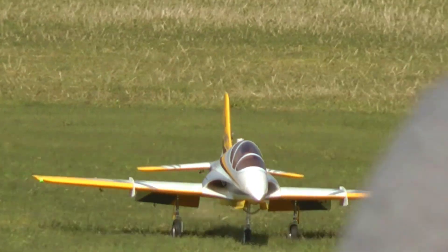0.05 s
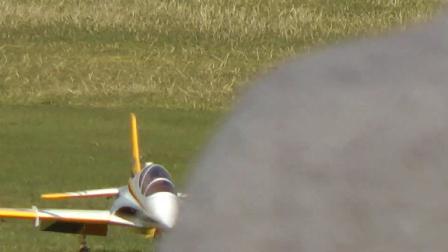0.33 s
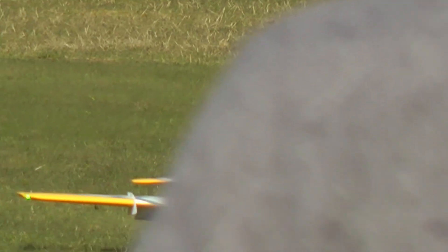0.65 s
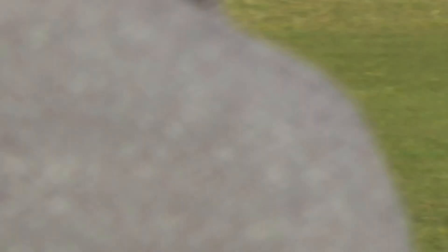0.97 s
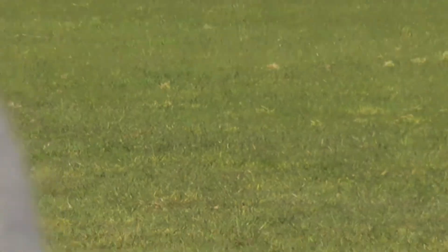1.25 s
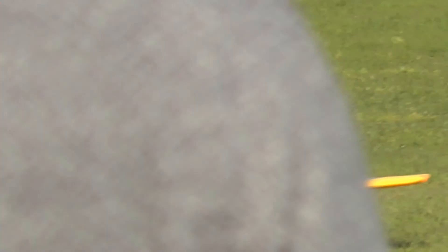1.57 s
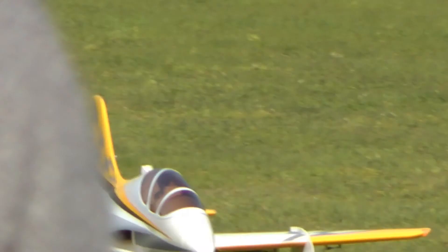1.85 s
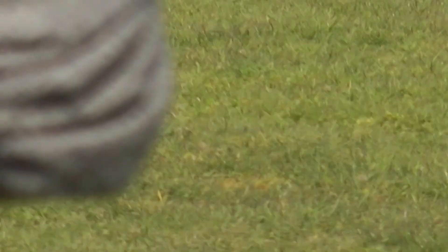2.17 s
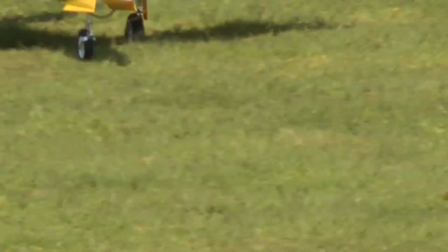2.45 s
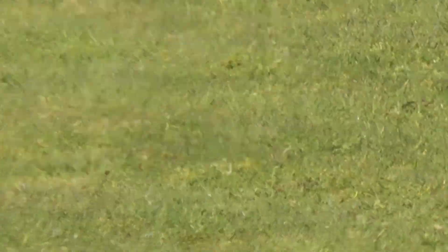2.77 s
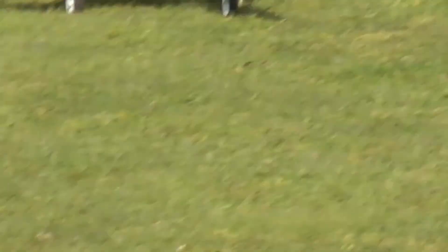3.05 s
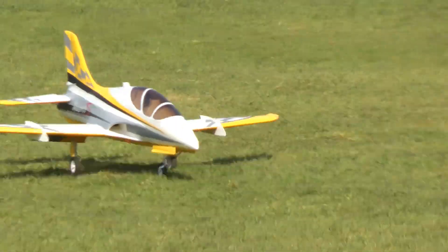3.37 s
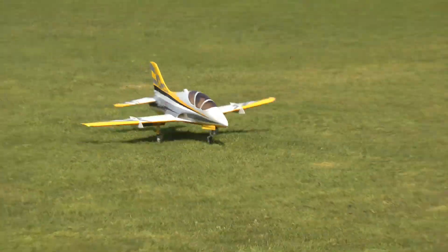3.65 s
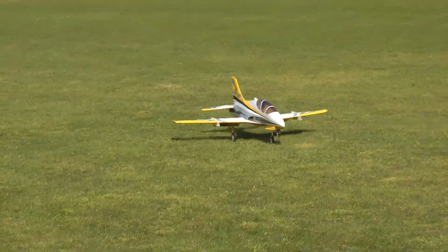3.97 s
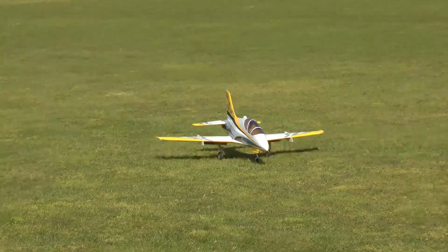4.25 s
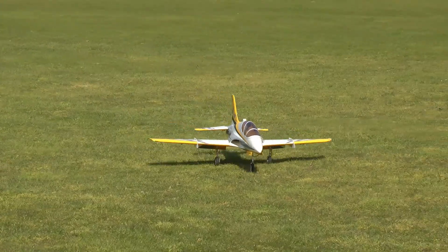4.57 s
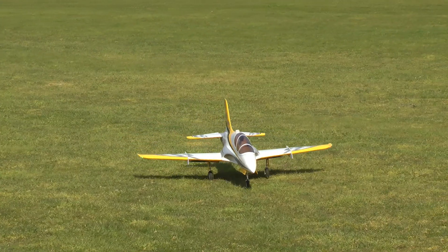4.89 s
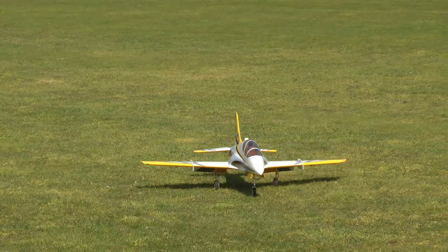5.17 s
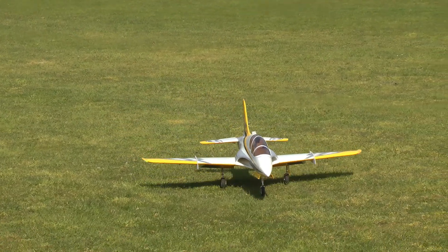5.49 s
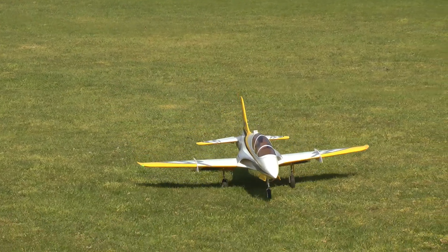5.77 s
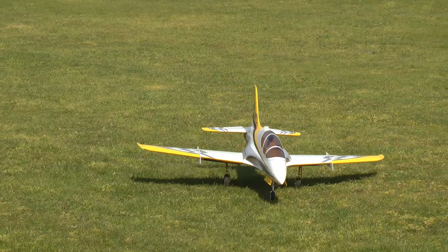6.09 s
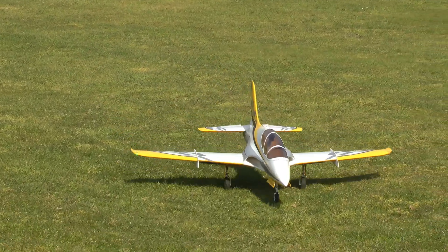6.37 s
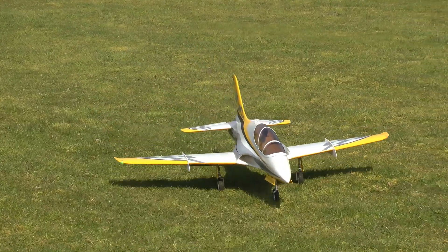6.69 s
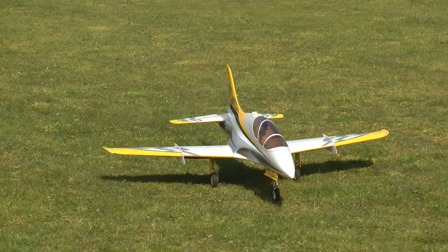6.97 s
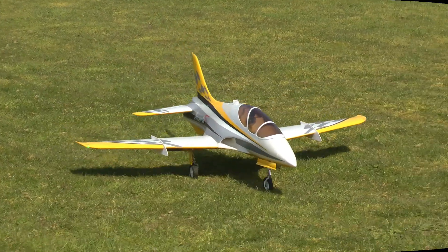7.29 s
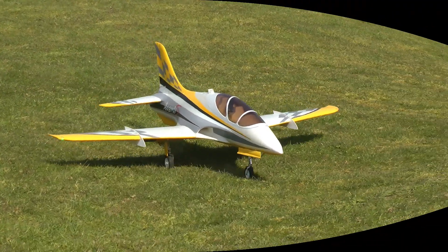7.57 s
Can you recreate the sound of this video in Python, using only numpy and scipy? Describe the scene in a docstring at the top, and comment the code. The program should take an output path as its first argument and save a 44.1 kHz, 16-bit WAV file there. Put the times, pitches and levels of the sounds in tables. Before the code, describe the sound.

Wind rumbles and buffets the microphone on an open grass field. A model jet's electric fan, faint at first, whines and rushes in short bursts of throttle, each rising in pitch with a thin high whistle and then sinking. It grows steadily louder as it taxis closer from straight ahead. At the end, close by, the tyres swish through the grass, the wheels rattle briefly and the fan runs down.

```python
"""An open grass field in the wind; a stereo microphone, and a model jet nearly straight ahead.
Gusts buffet the microphone from the start, while the electric ducted fan whines and rushes some way off.
The jet taxis closer on bursts of throttle, its speed controller whistling as it drives the motor.
In the longer coasts the motor sings a falling note. At the end, close by, the tyres swish through
the grass, the wheels jolt and the fan runs down."""
import sys
import numpy as np
from scipy import signal
from scipy.fft import rfft, irfft
from scipy.io import wavfile
from scipy.ndimage import uniform_filter1d

SR = 44100
rng = np.random.default_rng(int(sys.argv[2]) if len(sys.argv) > 2 else 0)


def generate_wav(sig):
    """Save sig (samples, or channels by samples) to the path in sys.argv[1] as 16-bit PCM at SR."""
    pcm = np.round(np.clip(np.atleast_2d(sig).T, -1, 1) * 32767).astype(np.int16)
    wavfile.write(sys.argv[1], SR, pcm)


N = 345744
T = np.arange(N) / SR
CRUISE_SPEED, IDLE_SPEED = 200, 125  # shaft turns a second (rps)

# pushes of the stick: opens t/s, rise/s, held no-load speed/rps, eases off t/s, fall/s,
# left at no-load speed/rps, then relative level/dB of switching whistle, blade tone and upper whine
THROTTLE = [(0.0, 0.0, 351, 0.087, 0.034, 297, -73, 8, 7),
            (0.299, 0.099, 305, 0.703, 0.134, 230, -66, -2, 0),
            (0.955, 0.065, 212, 1.225, 0.079, 164, -57, -4, 0),
            (1.333, 0.376, 303, 1.731, 0.238, 166, -46, -7, 0),
            (2.462, 0.219, 268, 2.787, 0.241, 139, -45, -6, 0),
            (3.06, 0.206, 348, 3.542, 0.206, 72, -40.5, -14, 3),
            (4.033, 0.175, 293, 4.49, 0.18, 112, -41, -8, -7),
            (4.905, 0.175, 297, 5.344, 0.257, 141, -49, -6, -7),
            (5.607, 0.132, 300, 5.886, 0.152, 168, -52, -2, -8),
            (6.138, 0.078, 298, 6.384, 0.186, 143, -41, -2, -8),
            (6.722, 0.1, 253, 6.949, 0.421, 0, -34, -3, -7)]
# the rush at cruising speed as the jet nears and turns: t/s, relative level/dB, intake honk/dB, treble/dB
BEARING = [(0, -58, 10, -4.5), (.28, -56, 0.5, -5.5), (.7, -45.5, -6, -13), (1.0, -44.5, -4, -15),
           (1.4, -41, -5.5, -14), (1.75, -39.5, -3.5, -11.5), (2.12, -38.5, -6.5, -6.5),
           (2.35, -34, -10.5, -16.5), (2.95, -36.5, 3.5, -17.5), (3.3, -34, -2, -18.5),
           (3.62, -31, -5, -16), (4.0, -29, -9.5, -24), (4.3, -27, -5, -21.5), (4.65, -32.5, -6, -18),
           (5.35, -32, -2, -14), (5.8, -28.5, 1, -13), (6.4, -27.5, 2.5, -10.5), (6.95, -26, 0.5, -14),
           (7.4, -28.5, 4, -11.5), (7.84, -22.5, 10, -11)]
# motor hum and tyres grow as the jet rolls up to the microphone: t/s, gain/dB
NEARNESS = [(4, -12), (4.9, -12), (7.3, 0), (7.84, 0)]


def gain_of(db):
    """Decibels to amplitude."""
    return 10 ** (np.asarray(db) / 20)


def unit_rms(x):
    """Scales to unit rms."""
    return x / np.sqrt(np.mean(x ** 2) + 1e-20)


def curve(rows, t, column=1):
    """One column of a table at the times t."""
    rows = np.asarray(rows, float)
    return np.interp(t, rows[:, 0], rows[:, column])


def spectrum(points, hz):
    """Joins (f/Hz, value) points on a log-frequency axis."""
    f, value = np.transpose(points)
    return np.interp(np.log(hz + 1), np.log(f + 1), value)


def wander(rate_hz):
    """Smooth random drift of unit rms, up to about the given rate."""
    f = np.fft.rfftfreq(N, 1 / SR)
    return unit_rms(irfft(rfft(rng.standard_normal(N)) / (1 + (f / rate_hz) ** 4), N))


def grid(size):
    """Frame times (a row) and bin frequencies (a column) of short-time spectra."""
    hop = size // 4
    return np.arange(N // hop + 5) * hop / SR, np.fft.rfftfreq(size, 1 / SR)[:, None]


def noise(shape_db, patchy_db, size):
    """Noise shaped in frequency and time, with drifting patches; a flat 0 dB gives about unit rms."""
    t, hz = grid(size)
    real, imag, patches = rng.standard_normal((3, len(hz), len(t)))
    patches = unit_rms(uniform_filter1d(uniform_filter1d(patches, 8, axis=0), 8, axis=1))
    frames = (real + 1j * imag) * gain_of(shape_db + patchy_db * patches)
    return signal.istft(frames, nperseg=size, noverlap=size - size // 4)[1][:N] * np.sqrt(2 / size)


def coloured(colour, patchy_db, size):
    """Patchy noise of unit rms with one overall spectrum."""
    return unit_rms(noise(spectrum(colour, grid(size)[1]), patchy_db, size))


def stereo(one, other, correlation):
    """Left and right with the given correlation, from two unrelated sounds."""
    side = np.sqrt((1 - correlation) / 2) * other
    return np.sqrt((1 + correlation) / 2) * one + np.array([side, -side])


def tone(hz, blur_rad):
    """A gliding tone of about unit rms, shaken in level and phase by turbulence."""
    flutter = gain_of(2.3 * wander(25) - .5)
    return np.sqrt(2) * np.sin(2 * np.pi * np.cumsum(hz) / SR + blur_rad * wander(98)) * flutter


def resonance(hz, centre_hz, width_hz):
    """Gain of one resonance, 1 at its centre."""
    return 1 / np.sqrt(1 + (2 * (hz - centre_hz) / width_hz) ** 2)


def field():
    """The soft wash of breeze over open grass, all around."""
    wash_colour = [(40, -1), (300, -4), (800, 8.5), (1200, 1), (1800, -7.5), (4000, -35), (8000, -60),
                   (15000, -86)]  # f/Hz, relative level/dB
    washes = [coloured(wash_colour, patchy_db=2.5, size=1024) for _ in range(2)]
    return gain_of(-42.5) * stereo(*washes, correlation=0.81)


def gusting(column):
    """Strength of buffeting (column 1) or rumble (2): the breeze plus a bell-shaped swell for each gust."""
    # wind between gusts: t/s, buffeting/dB, rumble/dB
    breeze = [(0, -36, -48), (.7, -28, -26), (1.3, -33, -35), (1.7, -37.5, -32), (2.4, -32, -33),
              (3.0, -27.5, -28.5), (3.5, -26, -27), (4.25, -24.5, -31), (4.9, -24, -29), (5.45, -30.5, -34),
              (6.1, -26, -32), (6.9, -27, -34), (7.5, -20.5, -31), (7.84, -26, -31)]
    # gusts on the microphone: t/s, half length/s, buffeting/dB, rumble/dB
    gusts = [(0.01, 0.044, -26, -19), (0.21, 0.061, -23.5, -20.5), (0.493, 0.061, -25.5, -21),
             (0.886, 0.044, -19, -29), (1.075, 0.094, -23.5, -42), (1.232, 0.028, -18, -34),
             (1.43, 0.11, -21.5, -33.5), (1.873, 0.035, -17, -20.5), (2.096, 0.0099, -14, -19.5),
             (2.181, 0.041, -20, -27.5), (2.64, 0.053, -22.5, -32), (2.944, 0.013, -17.5, -24),
             (3.092, 0.042, -17, -24), (3.4, 0.12, -22.5, -29), (3.696, .02, -25, -34),
             (3.86, 0.041, -21.5, -42), (4.055, 0.029, -25, -23.5), (4.48, .08, -24, -23),
             (4.724, 0.052, -16.5, -33), (4.832, 0.0099, -12.5, -21), (4.973, 0.092, -25, -25.5),
             (5.2, 0.048, -22, -21.5), (5.917, .06, -23.5, -32), (6.643, 0.058, -18.5, -31.5),
             (7.159, 0.039, -14, -39), (7.413, 0.032, -19.5, -22.5), (7.62, 0.071, -19, -43)]
    swells = sum(gain_of(levels[column - 1]) ** 2 * np.exp(-((T - at) / half_length) ** 2)
                 for at, half_length, *levels in gusts)
    return np.sqrt(gain_of(curve(breeze, T, column)) ** 2 + swells)


def wind():
    """Wind on the microphone: a rumble shared by both ports, and gusts that push them against each other."""
    # spectra of rumble and buffeting: f/Hz, relative level/dB
    rumble_colour = [(15, -25), (30, -22), (50, -11), (78, 4), (100, -6), (130, -14), (250, -22),
                     (1000, -55), (15000, -96)]
    buffet_colour = [(30, -10.5), (90, -14.5), (160, -1), (260, -4), (380, -7), (550, -12.5), (900, -23),
                     (1600, -37.5), (4000, -61), (15000, -126)]
    # how alike the ports are buffeted: f/Hz, left-right correlation
    buffet_correlation = [(40, 0.48), (125, -.05), (250, 0.07), (500, -0.72), (1200, -0.78)]
    rumbles = [coloured(rumble_colour, patchy_db=0.47, size=2048) for _ in range(2)]
    rumble = stereo(*rumbles, correlation=0.85)
    hz = grid(size=1024)[1]
    alike = np.clip(spectrum(buffet_correlation, hz), -.95, .95)
    colour_db = spectrum(buffet_colour, hz)
    common = noise(colour_db + 10 * np.log10(1 + alike), patchy_db=1.4, size=1024)
    opposed = noise(colour_db + 10 * np.log10(1 - alike), patchy_db=1.4, size=1024)
    buffet = unit_rms(np.array([common + opposed, common - opposed]))
    return (rumble * gusting(column=2) * gain_of(-0.2 + 1.07 * wander(17))
            + buffet * gusting(column=1) * gain_of(-1.96 + 2.55 * wander(37.4)))


def tyres():
    """The tyres swish unevenly through the grass, louder as the jet rolls close."""
    swish_colour = [(300, -10), (1500, 19), (2700, -11), (4300, 8), (5600, -11), (6400, -25), (7500, -40),
                    (11000, -19), (15000, -32)]  # f/Hz, relative level/dB
    swish = coloured(swish_colour, patchy_db=4.3, size=512)
    return swish * gain_of(-50.5 + curve(NEARNESS, T) + 2.2 * wander(25))


def wheels():
    """The landing gear rattles briefly on bumps in the turf."""
    jolts = [(4.813, -42, 0.0046), (7.277, -41, .004), (7.483, -55, 0.027), (7.553, -44, 0.015),
             (7.583, -53, .035)]  # t/s, level/dB, half length/s
    rattle_colour = [(300, -18), (1500, 2), (3100, -41), (5600, -17), (6400, 8), (7300, -18), (11000, -17),
                     (15000, -17)]  # f/Hz, relative level/dB
    shake = sum(gain_of(db) * np.exp(-((T - at) / half_length) ** 2) for at, db, half_length in jolts)
    return shake * gain_of(4.9 * wander(200)) * coloured(rattle_colour, patchy_db=2.5, size=512)


def dips():
    """Gain of the jet as its level drops abruptly and recovers, mostly at hard gusts."""
    drops = [(3.705, 4), (3.84, 8.5), (4.46, 4), (4.825, 10), (6.635, 7), (7.15, 4.5), (7.425, 6.5),
             (7.595, 8.5)]  # t/s, depth/dB
    fall_s, recovery_s = 0.0078, 0.12
    ages = [(np.maximum(T - at, 0), db) for at, db in drops]
    depth_db = sum(db * np.minimum(age / fall_s, 1) * np.exp(-(age / recovery_s) ** 2) for age, db in ages)
    return gain_of(-depth_db)


def stick():
    """The speed that the throttle asks for: each push ramps up, holds and eases off."""
    corners = []
    previous = THROTTLE[0][2]  # the first push is already held
    for opens, rise, held, eases, fall, left, *_ in THROTTLE:
        corners += [(opens, previous), (opens + rise, held), (eases, held), (eases + fall, left)]
        previous = left
    times, asked = np.transpose(corners)
    return np.interp(T, np.maximum.accumulate(times), asked)


def per_push(column):
    """One column of the throttle table, held from each push to the next and smoothed."""
    pushes = np.array(THROTTLE)
    latest = np.searchsorted(pushes[1:, 0], T)
    return uniform_filter1d(pushes[latest, column], size=3000)


def shaft(asked):
    """Shaft speed in rps: the motor pulls it up towards the stick; air drag and bearing friction brake it."""
    step_s, pull_s, drag_per_turn, friction_rps_per_s = .004, .1098, .01116, 69
    times = np.arange(0, T[-1] + step_s, step_s)
    speed, speeds = 261, []
    for goal in np.interp(times, T, asked):
        speeds.append(speed)
        pull = max(goal - speed, 0) / pull_s
        speed += step_s * (pull - drag_per_turn * speed ** 2 - friction_rps_per_s)
    return np.interp(T, times, speeds)


def flow_db(speed):
    """Relative level of the duct's airflow at the microphone: a steep power of the shaft speed."""
    return curve(BEARING, T) + 55.5 * np.log10(speed / CRUISE_SPEED)


def motor(speed):
    """At low speed the magnets hum past the stator; each tone flares in an airframe resonance."""
    # magnetic tones: multiples of the shaft speed; for each, relative level/dB, resonance f/Hz, width/Hz
    orders = [17, 28, 42, 42, 52, 70, 84]
    resonances = [(-41, 1780, 550), (-33, 2600, 520), (-22, 4330, 360), (-33, 1750, 260), (-41, 5000, 700),
                  (-45, 4300, 700), (-30, 4330, 360)]
    slow = np.clip((135 - speed) / 22, 0, 1)
    hum = sum(gain_of(db) * resonance(order * speed, hz, width) ** 1.5
              * tone(order * speed, blur_rad=0.16) * gain_of(2 * wander(27))
              for order, (db, hz, width) in zip(orders, resonances))
    return slow * gain_of(curve(NEARNESS, T)) * hum


def controller(speed, asked):
    """A switching whistle while the motor is driven, with chirps while current speeds the fan up."""
    switching = [(0, 8230), (1.8, 8165), (3.1, 8115), (5, 8085), (6.8, 8043), (7.84, 8035)]  # the whistle's sagging pitch: t/s, f/Hz
    # switching mixed with rotation: shaft multiples; for each, relative level/dB, resonance f/Hz, width/Hz
    orders = [23, 45, 23]
    resonances = [(9, 4400, 340), (-8, 1760, 220), (1, 4400, 340)]
    off_lead, full_lead = -5, 40  # the whistle fades in with the stick's lead over the shaft, in rps
    hz = curve(switching, T)
    driven = np.clip((asked - speed - off_lead) / (full_lead - off_lead), 0, 1) ** 2
    whistle = driven * gain_of(per_push(column=6) - 4.0 + 0.83 * wander(2.3)) * tone(hz, blur_rad=.25)
    acceleration = uniform_filter1d(np.gradient(speed) * SR, size=2205)
    current = np.sqrt(np.clip((acceleration + 10) / 400, 0, 1))
    # as the shaft speeds up one sideband falls, the other rises, and a plain shaft multiple rises too
    glides = hz - orders[0] * speed, orders[1] * speed - hz, orders[2] * speed
    chirps = sum(gain_of(db) * resonance(glide, ring_hz, width) ** 2 * tone(glide, blur_rad=.25)
                 for glide, (db, ring_hz, width) in zip(glides, resonances))
    return whistle + current * chirps * gain_of(-35 + 1.25 * (flow_db(speed) + 33))


def fan(speed):
    """Each blade tone swells in one duct resonance, and grows with the flow at the intake."""
    # fan tones: multiples of the shaft speed; for each, relative level/dB, resonance f/Hz, width/Hz
    orders = [12, 15, 18, 24, 36, 60, 76]
    resonances = [(-3, 2580, 240), (-9, 2170, 160), (-5, 3500, 1900), (-5, 4400, 280), (-9.5, 9100, 700),
                  (-13, 12800, 400), (-19, 11200, 300)]
    blade, low, whine, *upper = [
        gain_of(db) * resonance(order * speed, hz, width) * tone(order * speed, blur_rad=0.4)
        for order, (db, hz, width) in zip(orders, resonances)]
    # the blade-passing tone escapes fully only above the duct's cut-on, and beams out of the intake
    cut_on = np.clip((orders[0] * speed - 2330) / 130, .1, 1)
    beam = gain_of(flow_db(speed) + per_push(column=7) + 5.5)
    overtones = low + whine * gain_of(per_push(column=8)) * speed / CRUISE_SPEED + sum(upper)
    return blade * cut_on * beam + overtones * gain_of(-6.5 + 0.87 * flow_db(speed))


def rush(speed):
    """Turbulent air in the duct: hollow when slow, brighter when fast, coloured by where the jet points."""
    rush_colour = [(250, -37), (700, 1), (900, -12), (1120, -6.5), (1550, -17.5), (2150, -9.5), (2600, -3),
                   (3200, -3.5), (4100, 3.5), (5100, 1), (7500, -10), (9800, -9.5), (12500, -18),
                   (15500, -24.5)]  # f/Hz, relative level/dB
    ripple = [(5670, 295, -7.5), (6330, 510, 4.5), (7100, 220, -1.5)]  # two dips and a peak in that spectrum: f/Hz, width/Hz, gain/dB
    t, hz = grid(size=512)
    frame_speed = np.interp(t, T, speed)
    decades = np.log10(np.maximum(frame_speed, IDLE_SPEED) / CRUISE_SPEED)
    honk_db = curve(BEARING, t, column=2) - 36 * decades + 5
    treble_db = curve(BEARING, t, column=3) + 8 * decades + 12.5
    scream_db = 3.5 * np.clip((frame_speed - 220) / (258 - 220), 0, 1)  # only near top speed
    shape_db = (spectrum(rush_colour, hz)
                + sum(db * np.exp(-((hz - f) / width) ** 2) for f, width, db in ripple)
                + honk_db * spectrum([(2900, 0.91), (3900, 0.06)], hz)
                + treble_db * spectrum([(5500, 0.07), (9000, 0.89)], hz)
                + scream_db * np.exp(-((hz - 5500) / 1500) ** 2))
    air = stereo(*(noise(shape_db, patchy_db=1.1, size=512) for _ in range(2)), correlation=.984)
    return air * gain_of(flow_db(speed) + 10.5 + 0.76 * wander(34))


def scene():
    """The jet, a touch right of centre, with wind on the microphone and the field behind."""
    asked = stick()
    speed = shaft(asked)
    running = rush(speed) + fan(speed) + controller(speed, asked) + motor(speed) + tyres()
    jet = running * dips() + wheels()
    return jet * gain_of([[-.25], [.25]]) + wind() + field()


def record(dry):
    """The recorder's band limit."""
    edge_hz = 15750
    lowpass = signal.firwin(511, edge_hz, window=("kaiser", 9), fs=SR)
    return signal.oaconvolve(dry, lowpass[None], "same")


dry = scene()
out = record(dry)
generate_wav(out)
```